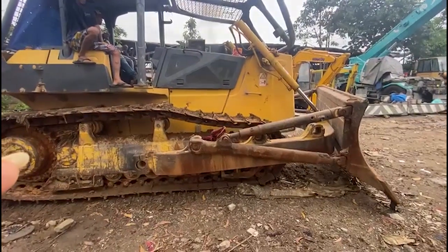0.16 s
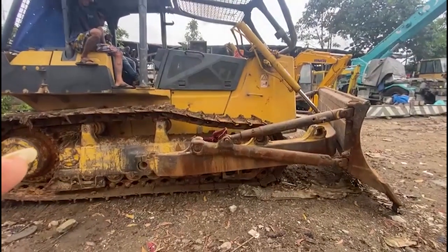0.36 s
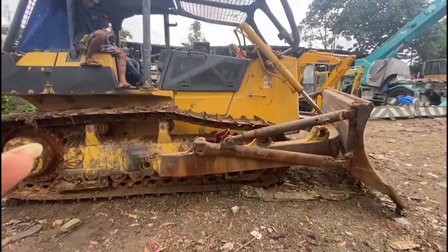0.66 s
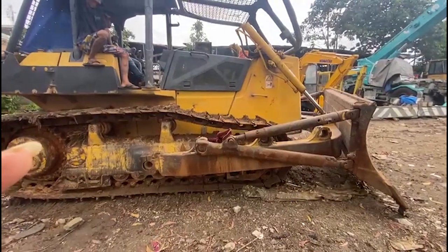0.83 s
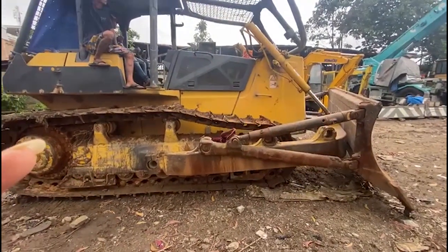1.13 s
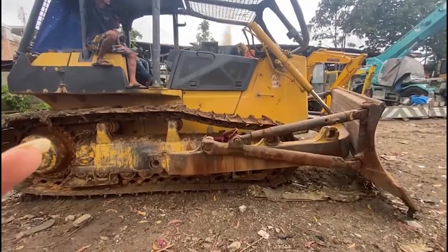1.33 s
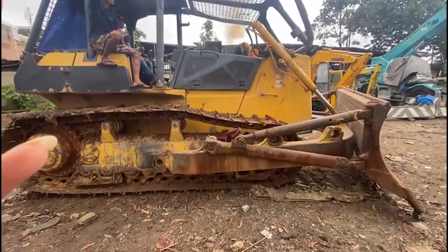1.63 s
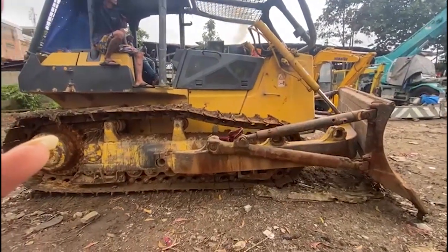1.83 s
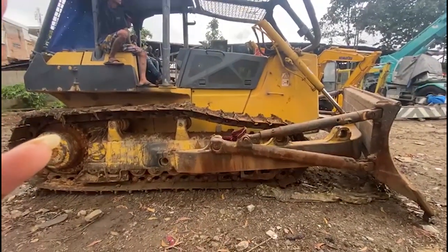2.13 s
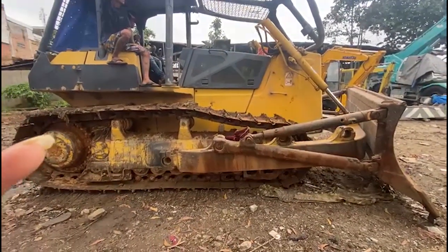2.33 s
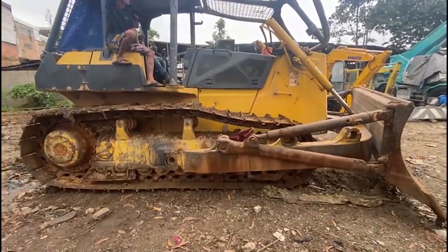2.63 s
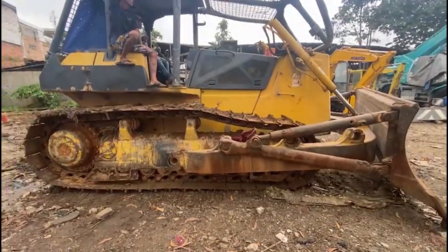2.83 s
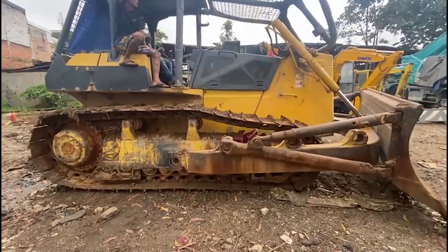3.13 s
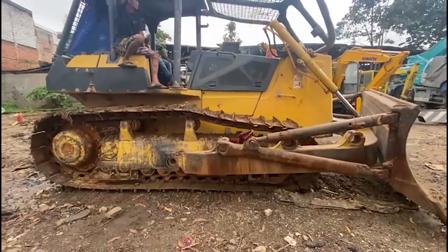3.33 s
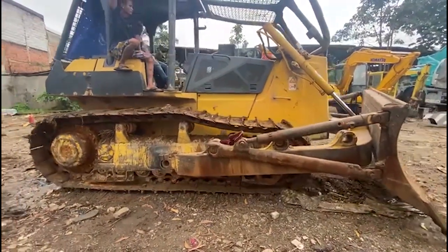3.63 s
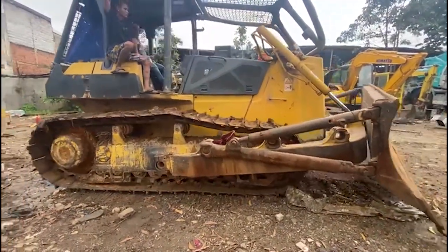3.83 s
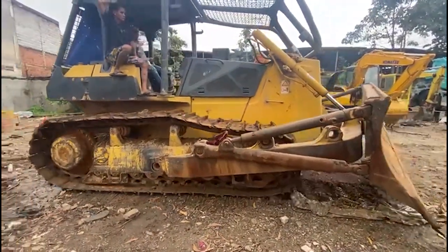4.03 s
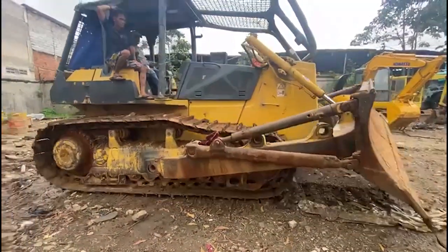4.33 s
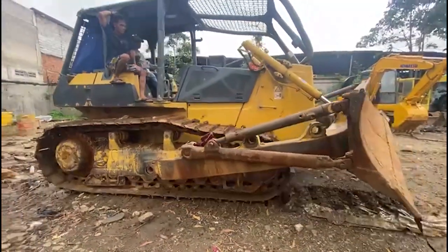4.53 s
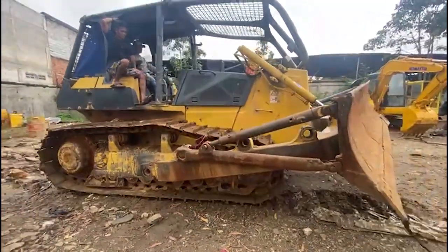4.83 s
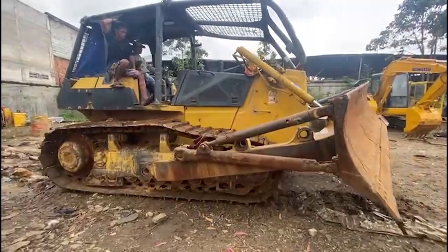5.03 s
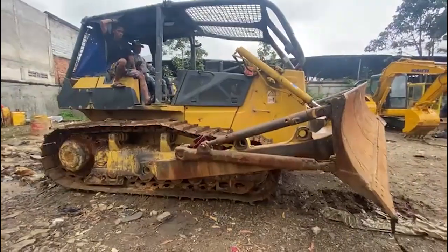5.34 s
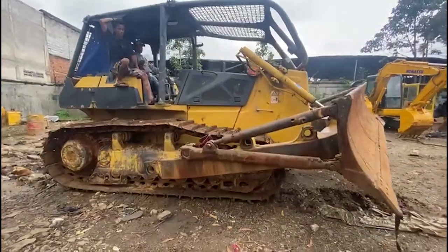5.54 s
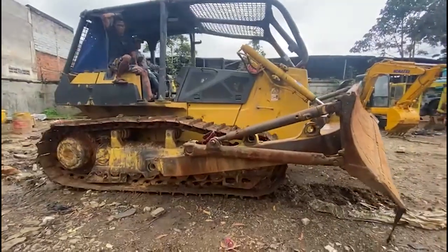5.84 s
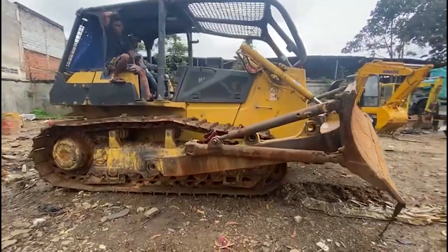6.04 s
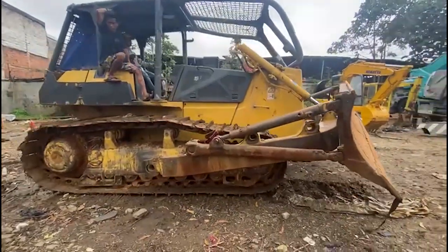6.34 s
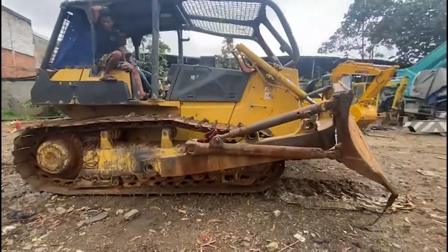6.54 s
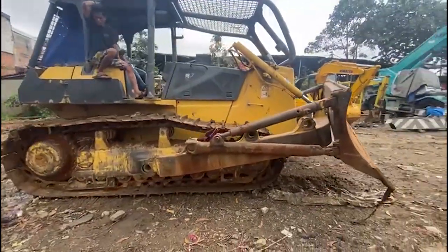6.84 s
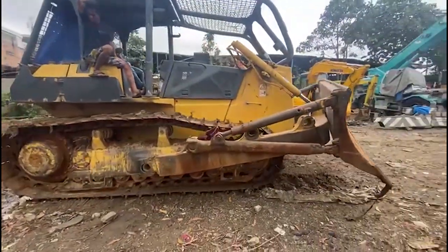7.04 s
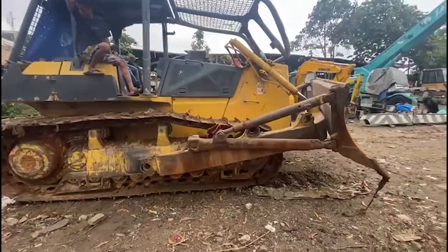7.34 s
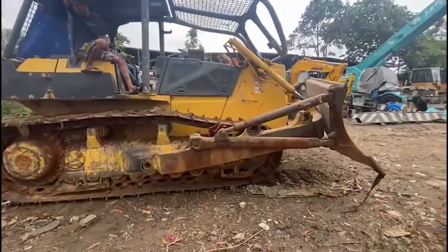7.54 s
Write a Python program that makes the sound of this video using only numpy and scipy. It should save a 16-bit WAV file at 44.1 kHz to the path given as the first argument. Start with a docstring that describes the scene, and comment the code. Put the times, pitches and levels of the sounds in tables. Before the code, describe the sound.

A bulldozer's turbo diesel engine runs throughout in an open yard, a low throbbing drone with knocking clatter, a thin high whistle and faint short echoes. For the first second it winds down, drone and whistle falling in pitch. At about 1.2 seconds it revs sharply with a rasp and a burst of hiss, the whistle climbing and loose steel clanking lightly twice. It drops back to idle by 2 seconds while the whistle keeps sinking. A second rev rises from 3 to 3.5 seconds, then the engine runs under light throttle until nearly 5 seconds. A brief low tone swells and fades around 4.1 seconds. A smaller third rev at 5.2 seconds brings a quick cluster of steel clanks, followed by another hissing push of throttle. From 6 seconds the engine idles steadily, with one faint clank and a second brief low tone near 7.3 seconds.

```python
"""A bulldozer's six-cylinder turbo diesel runs down, is revved three times and settles, in an open yard.
Each firing thumps the exhaust, knocks the block and shakes the turbocharger, whose whistle climbs and
sinks with the boost. Fuel makes the engine rasp and the air rush; on the overrun the firing tone drops
out and the fan and gears sing on. Loose steel clanks and two brief low tones swell and fade.
Machines and walls give short echoes."""
import sys
import numpy as np
from scipy import signal
from scipy.fft import rfft, irfft, next_fast_len
from scipy.io import wavfile

SR = 44100
rng = np.random.default_rng(int(sys.argv[2]) if len(sys.argv) > 2 else 0)


def bounce(signal):
    """Save signal as a 16-bit WAV file at the path given by the first command-line argument."""
    frames = np.transpose(np.atleast_2d(signal))
    limited = np.clip(frames, -1, 1)
    pcm = np.round(limited * 32767).astype(np.int16)
    wavfile.write(sys.argv[1], SR, pcm)


N = 338247
TIME = np.arange(N) / SR
SIDES = np.array([[1], [-1]])  # left, right

# Each row: cylinder in firing order, relative strength in dB.
CYLINDERS = [(1, 3), (2, 4), (3, 1.5), (4, 3), (5, 2), (6, 3.5)]
# Bodywork resonances. Each row: centre in Hz, width in Hz, lift in dB.
PANELS = [(269, 26, 9), (365, 55, 7), (448, 45, 9)]


def amp(db):
    """Decibels to gain."""
    return 10 ** (np.asarray(db) / 20)


def unit_rms(x):
    """Scales to rms 1."""
    return x / np.sqrt(np.mean(x ** 2) + 1e-20)


def at_hz(points, hz):
    """Interpolates a table over log frequency."""
    knots_hz, values = np.transpose(points)
    return np.interp(np.log(hz + 1), np.log(knots_hz), values)


def held(start_s, length_s, rise_s, fall_s):
    """Envelope: rises to 1, holds, falls after length_s."""
    age_s = TIME - start_s
    return np.clip(age_s / rise_s, 0, 1) * np.clip(1 - (age_s - length_s) / fall_s, 0, 1)


def wander(rate_hz):
    """Smooth random drift of rms 1, rolled off above rate_hz."""
    knots = rng.standard_normal(N // 16)
    hz = np.fft.rfftfreq(len(knots), 16 / SR)
    slow = irfft(rfft(knots) * np.exp(-(hz / rate_hz) ** 2), len(knots))
    return unit_rms(np.interp(TIME, np.linspace(0, TIME[-1], len(slow)), slow))


def resonant_db(modes, hz):
    """Summed lift of the resonances at hz."""
    return sum(db / (1 + (2 * (hz - centre) / width) ** 2) for centre, width, db in modes)


def struck(hits, hz, db, t60_s, rise_s=0.0003):
    """One damped mode rung by a train of hits."""
    age_s = TIME[:4096]
    envelope = amp(db - 60 * age_s / t60_s) * (1 - np.exp(-age_s / rise_s))
    return signal.oaconvolve(hits, envelope * np.sin(2 * np.pi * hz * age_s))[:N]


def machine_body(x, spectrum, ripple_db=2, ripple_hz=70, size=4096):
    """Rings x through a broad spectrum, the machine's main modes and many small random ones."""
    # Panel, block and duct modes. Each row: centre in Hz, width in Hz, lift in dB (negative: a gap).
    modes = [(280, 28, 5), (600, 260, -5.5), (795, 35, 1), (1000, 80, 11), (1140, 70, 7), (2030, 70, 3.5),
             (2230, 70, 2), (3410, 130, 6.5), (3800, 220, 4), (5850, 250, 3)]
    hz = np.fft.rfftfreq(size, 1 / SR)
    ripple = np.interp(hz, np.arange(400) * ripple_hz, rng.standard_normal(400))
    small_db = ripple_db * ripple * hz / (hz + 1000)
    log_gain = np.log(amp(at_hz(spectrum, hz) + resonant_db(modes, hz) + small_db))
    mirrored = np.concatenate([log_gain, log_gain[-2:0:-1]])
    minimum_phase = np.exp(np.conj(signal.hilbert(mirrored)))
    response = np.fft.ifft(minimum_phase).real[:size // 2]
    return signal.oaconvolve(x, response[None], axes=1)[:, :N]


def stereo(pair):
    """Mixes two unrelated signals to a partly alike left and right; their mean has rms 1."""
    # Each row: frequency in Hz, left-right likeness 0-1.
    likeness = [(60, .75), (130, .62), (300, .8), (600, .45), (1000, .7), (1800, .45), (2200, .65),
                (3000, .5), (6000, .7), (8500, .68), (10500, .8)]
    # Each row: frequency in Hz, left minus right in dB.
    balance = [(130, 0), (270, 1), (580, 2.5), (1250, 3), (2670, -0.5), (5700, -0.1)]
    # Each row: frequency in Hz, phase lead of the left in radians.
    phase_lead = [(500, 0), (700, 2.1), (1100, -0.7), (2200, 0.28), (3400, 1.53), (4200, 1.8), (5200, 2.5),
                  (5800, 0.46), (6500, 0.87), (7200, 1.14), (8100, 3), (10000, -0.36)]
    size = next_fast_len(N)
    hz = np.fft.rfftfreq(size, 1 / SR)
    alike, lead_rad = np.clip(at_hz(likeness, hz), 0, 0.98), at_hz(phase_lead, hz)
    direct, diffuse = rfft(pair, size) * np.sqrt([1 + alike, 1 - alike])
    tilt = np.sqrt(amp(at_hz(balance, hz))) * np.exp(0.5j * lead_rad)
    centre = np.sqrt(1 + alike * np.cos(lead_rad))
    spectra = np.array([(direct + diffuse) * tilt, (direct - diffuse) / tilt])
    out = irfft(spectra / centre, size)[:, :N]
    return out / np.std(out.mean(0))


def throttle(open_s=0.0092, shut_s=0.027):
    """The fuel rack opens fast and shuts more slowly. Returns fuel 0-1 and extra hiss in dB."""
    # Each row: start in seconds, length in seconds, first and last fuel 0-1, extra hiss in dB.
    pushes = [(1.21, 0.27, 0.83, 0.52, 4.5), (3.043, 0.44, 0.89, 0.33, 1.5), (3.716, 1.16, 0.33, 0.26, 1),
              (5.194, 0.16, 0.68, 0.45, 1), (5.562, 0.6, 0.47, 0.09, 2), (7.203, 0.082, 0.25, 0.04, 1)]
    fuel, hiss_db = np.zeros((2, N))
    for start_s, length_s, first, last, db in pushes:
        push = held(start_s, length_s, open_s, shut_s)
        fuel += push * np.interp(TIME, [start_s, start_s + length_s], [first, last])
        hiss_db += push * db
    return fuel, hiss_db


def layer_levels(firing_hz, fuel, cruise_hz=58, slip_s=0.079):
    """Each layer's gain in dB, from engine speed, fuel and overrun."""
    # Coasting with the fuel cut back. Each row: start in seconds, length in seconds, depth 0-1.
    overruns = [(0.02, 0.54, 0.8), (0.534, 0.64, 0.8), (1.48, 0.42, 1), (3.496, 0.11, 0.8),
                (4.81, 0.4, 0.22)]
    # Each layer: dB at cruise, dB per doubling of speed, dB added at full fuel, dB added on overrun.
    gains = {"firing": (-23, 4.5, 2, -22), "drone": (-26.3, 7, 5, -16), "auxiliaries": (-0.5, 9, -2, 1.5),
             "rumble": (-27, 7, 0.5, -2), "knock": (-33, 4, 1, -3), "ring": (-35, -1, 6, -4),
             "rasp": (-38.7, 3.5, 10, 4), "duct hiss": (-42.5, 8, 18, 0.5), "rush": (-42, 0, 11.5, -8),
             "whistle": (-0.5, 4, 7.5, -3), "whistle skirt": (-4.5, -2, 13, 2)}
    overrun = sum(depth * held(start_s, length_s, slip_s, slip_s)
                  for start_s, length_s, depth in overruns)
    octaves = np.log2(firing_hz / cruise_hz)
    return {layer: db + speed_db * octaves + fuel_db * fuel + overrun_db * overrun
            for layer, (db, speed_db, fuel_db, overrun_db) in gains.items()}


def pulses(firings, decay, base, late, rise=0.36, uneven=1):
    """One unequal swell per firing over a steady base; decay, late and rise in firing intervals."""
    index, since = np.divmod(firings + 1 - late, 1)
    index = index.astype(int)
    strength_db = np.transpose(CYLINDERS)[1][index % len(CYLINDERS)]
    chance_db = rng.uniform(-4, 4, size=1024)[index]
    swell = np.exp(-since / decay) * (1 - np.exp(-since / rise)) * np.sqrt(1 - since)
    return unit_rms(base + amp(uneven * (strength_db + chance_db)) * swell / swell.max())


def impacts(firings, jitter, count=400):
    """Valves, injectors and pistons strike at set crank angles; jitter in firing intervals."""
    cycles = np.arange(int(firings[-1] / len(CYLINDERS)) + 1)[:, None]
    pair = np.zeros((2, N))
    for side in pair:
        angle, force = rng.random(count), rng.standard_normal(count)
        slip = jitter * rng.standard_normal((len(cycles), count))
        at = np.searchsorted(firings, (cycles + angle) * len(CYLINDERS) + slip)
        side += np.bincount(at.ravel(), np.tile(force, len(cycles)), N + 1)[:N]
    return unit_rms(pair)


def clatter(firings, spectrum, envelope, impact_share, jitter):
    """Repeating impacts and combustion noise ring a part of the machine."""
    strikes = np.sqrt(impact_share) * impacts(firings, jitter)
    combustion = np.sqrt(1 - impact_share) * rng.standard_normal((2, N))
    return stereo(machine_body((strikes + combustion) * envelope, spectrum))


def rumble(firings, shake_db=1.5):
    """Low clatter of loose panels shaking unevenly."""
    # Each row: frequency in Hz, relative density in dB.
    spectrum = [(20, -14), (42, -4), (80, 0), (130, 0), (190, -3), (260, -5), (330, -0.5), (430, -4.5),
                (600, -6.5), (800, -13.5), (1500, -54.5)]
    shake = amp(shake_db * wander(4.2))
    envelope = pulses(firings, decay=0.71, base=1.57, late=0.36)
    return shake * clatter(firings, spectrum, envelope, impact_share=0.26, jitter=0.013)


def knock(firings):
    """Midrange clatter: each firing knocks the block."""
    # Each row: frequency in Hz, relative density in dB.
    spectrum = [(300, -39.5), (620, -12.5), (800, 1), (1000, -6.5), (1180, -8), (1350, -2), (1800, -7.5),
                (2100, -13.5), (2800, -16), (5000, -39.5)]
    envelope = pulses(firings, decay=0.34, base=2, late=0.1)
    return clatter(firings, spectrum, envelope, impact_share=0.35, jitter=0.004)


def rasp(firings):
    """Bright clatter, mostly combustion noise."""
    # Each row: frequency in Hz, relative density in dB.
    spectrum = [(500, -48), (750, -3), (1000, 3), (1300, -18), (1700, 1), (2150, 5), (2800, 1.5), (3800, 0),
                (4500, 2.5), (5100, 3), (7000, -4), (8600, -52), (11000, -9), (12000, -44)]
    envelope = pulses(firings, decay=1, base=1.3, late=0.15, uneven=0.8)
    return clatter(firings, spectrum, envelope, impact_share=0.2, jitter=0.0024)


def turbo_whistle(firings, blade_hz, skirt_db, line_hz=14, skirt_hz=230, ripple_hz=10, octave_db=-35):
    """The compressor's blade tone: a wavering line that each firing chops and tears into a skirt."""
    # Intake duct response. Each row: frequency in Hz, gain in dB.
    duct = [(5700, -24.5), (6050, -27.5), (6380, -36), (6580, -32.5), (6900, -35.5), (7200, -31),
            (7550, -39), (8100, -40), (8700, -40.5)]
    # Brief swells of the whistle. Each row: start in seconds, length in seconds, lift in dB.
    flares = [(1.195, 0.0049, 5), (1.218, 0.0088, 11), (1.254, 0.0066, 12), (3.051, 0.0062, 3.5),
              (4.378, 0.37, 2), (5.46, 0.07, 8), (5.684, 0.05, 8)]
    shaken_hz = blade_hz + ripple_hz * np.sin(2 * np.pi * firings)
    spin = np.exp(2j * np.pi * np.cumsum(shaken_hz) / SR)
    blades = spin + amp(octave_db) * spin ** 2
    chop = pulses(firings, decay=0.8, base=0.45, late=0.15, rise=0.6, uneven=0.3)
    tear = pulses(firings, decay=0.5, base=0.3, late=0.2, rise=0.6, uneven=0.4)
    pair = np.zeros((2, N))
    for side in pair:
        line = chop * np.exp(1j * wander(line_hz))
        skirt = amp(skirt_db) * tear * (wander(skirt_hz) + 1j * wander(skirt_hz)) / np.sqrt(2)
        side += unit_rms(((line + skirt) * blades).real / np.sqrt(1 + amp(skirt_db) ** 2))
    flare_db = sum(db * held(start_s, length_s, rise_s=0.004, fall_s=0.018)
                   for start_s, length_s, db in flares)
    return amp(at_hz(duct, blade_hz) + flare_db) * stereo(pair)


def block_ring(firings, fuel, stagger=0.6, jitter_s=0.0005, chance_db=1.5):
    """Each firing strikes every block mode at its own crank angle; fuel brightens the blow."""
    # Each row: frequency in Hz, relative level in dB, t60 in seconds, lift at full fuel in dB.
    modes = [(995, -2.5, .04, -1), (1085, -8, .025, 1), (1142, -1.5, .042, -7), (1430, -14, .015, 0),
             (2020, -15, .05, 10), (2210, -21.5, .07, 12), (2430, -15, .04, 2), (2780, -19, .03, 5),
             (3395, -15.5, .045, 5), (3660, -20.5, .05, 14), (3815, -20.5, .035, 8), (5030, -19, .045, 9)]
    index = np.arange(int(firings[-1]) - 1)
    cylinder = index % len(CYLINDERS)
    strength_db = np.transpose(CYLINDERS)[1][cylinder]
    pair = np.zeros((2, N))
    for side in pair:
        for hz, db, t60_s, fuel_db in modes:
            slip, chance = rng.standard_normal((2, len(index)))
            late = stagger * rng.random(len(CYLINDERS))[cylinder]
            at = np.searchsorted(firings, index + late) + (jitter_s * SR * slip).astype(int)
            hits = np.bincount(np.clip(at, 0, N - 1), amp(strength_db / 2 + chance_db * chance), N)
            side += struck(hits * amp(fuel_db * fuel), hz, db, t60_s)
    return stereo(pair)


def air_rush(firings, blade_hz, half_width_hz=720, below_hz=170):
    """Air puffs through the compressor, in a wide band around the blade tone."""
    spin = np.exp(2j * np.pi * np.cumsum(blade_hz - below_hz) / SR)
    lowpass = signal.butter(4, half_width_hz, fs=SR, output="sos")
    noise = signal.sosfilt(lowpass, rng.standard_normal((2, 2, N)))
    band = unit_rms(((noise[0] + 1j * noise[1]) * spin).real)
    return stereo(band * pulses(firings, decay=0.97, base=0.55, late=0.36, uneven=0.99))


def bright_hiss(firings):
    """Puffs of bright hiss, strongest near 6 kHz, with uneven bands in the top treble."""
    # Each row: frequency in Hz, relative density in dB.
    spectrum = [(3500, -30), (4700, -36), (5400, 5.5), (5950, 12.5), (6500, 9), (7200, 8.5), (7700, 2.5),
                (8100, -18), (8550, 9.5), (9300, -47), (10100, 0.5), (11300, -4.5), (12000, -25)]
    hiss = unit_rms(machine_body(rng.standard_normal((2, N)), spectrum))
    return stereo(hiss * pulses(firings, decay=1, base=1, late=0.12, uneven=0.98))


def exhaust(firings, firing_hz, firing_db, drone_db, sway_db=0.5, waver_rad=0.2, spread_rad=0.42):
    """The firing tone and a drone of higher orders that sweep through the panel resonances."""
    # Each row: multiple of the firing rate, level in dB relative to the drone.
    orders = [(1.5, -14.5), (2, -3.5), (3, -20), (4, -13), (6, -25)]
    swaying_db = drone_db + sway_db * wander(2.8)
    tones = amp(firing_db + 0.33 * SIDES) * np.cos(2 * np.pi * firings + 0.028 * SIDES)
    for order, db in orders:
        phase = 2 * np.pi * (order * firings + rng.random()) + waver_rad * wander(15)
        gain = amp(swaying_db + db + resonant_db(PANELS, order * firing_hz))
        tones += gain * (1 + 0.2 * wander(8.5)) * np.cos(phase - spread_rad * SIDES)
    return np.sqrt(2) * tones


def fan_and_gears(firings, firing_hz, waver_rad=0.36, spread_rad=0.4):
    """Blades and gears hum at fixed ratios to the crankshaft, louder at a panel resonance."""
    # Each row: multiple of the firing rate, relative level in dB.
    orders = [(1.8, -31), (3.6, -43), (4.67, -44.5), (5.4, -44), (9.33, -51), (16.5, -48)]
    tones = np.zeros((2, N))
    for order, db in orders:
        phase = 2 * np.pi * order * firings + waver_rad * wander(12)
        gain = amp(db + resonant_db(PANELS, order * firing_hz))
        tones += gain * (1 + 0.36 * wander(42)) * np.cos(phase + spread_rad * SIDES)
    return np.sqrt(2) * tones


def yard(dry, echo_db=-14, t60_s=0.026, count=40):
    """Adds short echoes from the ground, walls and parked machines."""
    echoes = []
    for side in dry:
        delay_s = rng.uniform(0.004, 0.15, count)
        taps = np.zeros(SR // 2)
        taps[(delay_s * SR).astype(int)] = rng.choice([-1, 1], count) * amp(-60 * delay_s / t60_s)
        echoes.append(signal.oaconvolve(side, taps / np.linalg.norm(taps))[:N])
    return dry + amp(echo_db) * np.array(echoes)


def clanks(t60_s=0.08, rise_s=0.001):
    """Engine jolts strike the frame and rattle loose steel."""
    # Each row: start in seconds, rattle in dB, thud in dB.
    jolts = [(1.257, -21, -22), (1.413, -23, -20), (5.233, -19, -7.5), (5.292, -22, -14), (5.317, -25, -18),
             (5.345, -28, -18), (6.12, -35, -15)]
    # Loose steel. Each row: frequency in Hz, relative density in dB.
    steel_spectrum = [(100, -7), (200, -18), (380, 2.5), (650, -2), (1000, -7), (2100, -3.5), (4500, 0),
                      (7000, -9), (9000, -11)]
    # Each row: frequency in Hz, level in dB relative to the thud, t60 in seconds.
    frame_modes = [(250, -7, .035), (400, 1, .03), (540, -7, .018), (1000, -11, .05), (1090, -12, .12),
                   (2143, -18, .14), (4830, -14, .035), (5040, -20, .06)]
    shake, hits = np.zeros((2, N))
    for start_s, rattle_db, thud_db in jolts:
        age_s = np.maximum(TIME - start_s, 0)
        shake += amp(rattle_db - 60 * age_s / t60_s) * (1 - np.exp(-age_s / rise_s))
        hits[round(start_s * SR)] = amp(thud_db)
    rattle = shake * stereo(machine_body(rng.standard_normal((2, N)), steel_spectrum))
    return rattle + sum(struck(hits, *mode, rise_s=0.0007) for mode in frame_modes)


def low_swells(sigma_s=0.052, waver_rad=0.43):
    """Two brief low tones swell and fade."""
    # Each row: peak time in seconds, frequency in Hz, level in dB.
    swells = [(4.11, 220.2, -28.5), (7.25, 323.2, -25)]
    out = np.zeros(N)
    for peak_s, hz, db in swells:
        swell = amp(db) * np.exp(-((TIME - peak_s) / sigma_s) ** 2 / 2)
        out += swell * np.sin(2 * np.pi * hz * TIME + waver_rad * wander(40))
    return out


def scene(surge_rms_db=1.0, surge_hz=9):
    """One crankshaft times the engine's layers; all but the hum and low swells echo in the yard."""
    # Each row: time in seconds, firing rate in Hz.
    engine_speed = [(0.0, 77), (0.12, 75), (0.3, 68.8), (0.5, 62.3), (0.75, 55.5), (0.96, 50.8),
                    (1.12, 47.1), (1.21, 47.2), (1.49, 65.3), (1.62, 62.3), (1.79, 57.5), (1.96, 55.2),
                    (2.4, 55.9), (3.05, 55.4), (3.25, 63), (3.48, 65.6), (3.74, 56.6), (4.1, 57.2),
                    (4.69, 57.3), (4.88, 60), (5.2, 58.5), (5.34, 62.8), (5.56, 57.6), (5.92, 60),
                    (7.67, 60.1)]
    # Each row: time in seconds, blade tone in Hz.
    turbo_speed = [(0.0, 8902), (0.25, 8100), (1.19, 5899), (1.34, 7089), (1.47, 8086), (1.49, 8098),
                   (1.71, 7192), (2.01, 6645), (2.5, 6039), (3.03, 5703), (3.22, 7098), (3.31, 7634),
                   (3.48, 8031), (3.5, 8007), (3.69, 7190), (4.04, 7331), (4.8, 7154), (5.19, 6484),
                   (5.36, 7149), (5.49, 6790), (5.57, 6720), (5.79, 6960), (6.17, 6787), (6.51, 6589),
                   (7.05, 6390), (7.35, 6402), (7.67, 6483)]
    firing_hz = np.interp(TIME, *np.transpose(engine_speed))
    blade_hz = np.interp(TIME, *np.transpose(turbo_speed))
    firings = np.cumsum(firing_hz) / SR  # running count
    fuel, hiss_db = throttle()
    db = layer_levels(firing_hz, fuel)
    surge_db = surge_rms_db * wander(surge_hz)  # the intake air swells unevenly
    engine = amp(db["rumble"]) * rumble(firings)
    engine += amp(db["knock"]) * knock(firings)
    engine += amp(db["rasp"]) * rasp(firings)
    engine += amp(db["whistle"] + surge_db) * turbo_whistle(firings, blade_hz, db["whistle skirt"])
    engine += amp(db["ring"]) * block_ring(firings, fuel)
    air = amp(db["rush"] + surge_db) * air_rush(firings, blade_hz)
    air += amp(db["duct hiss"] + hiss_db) * bright_hiss(firings)
    hum = exhaust(firings, firing_hz, db["firing"], db["drone"])
    hum += amp(db["auxiliaries"]) * fan_and_gears(firings, firing_hz)
    return hum + low_swells() + yard(engine + air + clanks())


def record(dry, cutoff_hz=11900):
    """Steep low-pass on the mix."""
    lowpass = signal.firwin(401, cutoff_hz, window=("kaiser", 9), fs=SR)
    return signal.oaconvolve(dry, lowpass[None], "same")


dry = scene()
out = record(dry)
bounce(out)
```